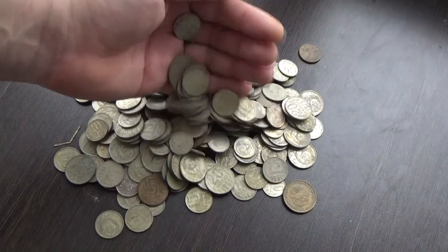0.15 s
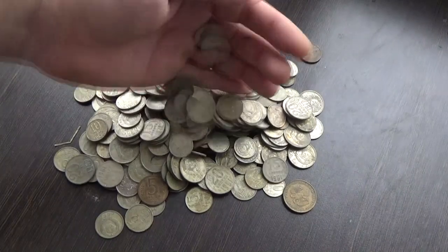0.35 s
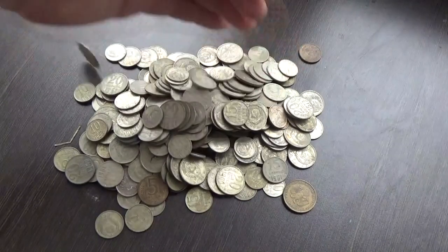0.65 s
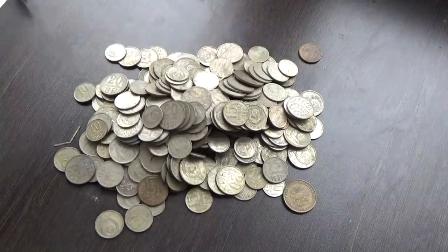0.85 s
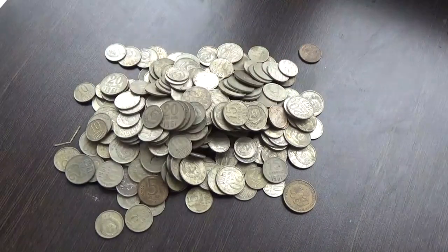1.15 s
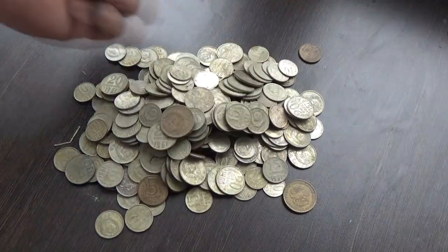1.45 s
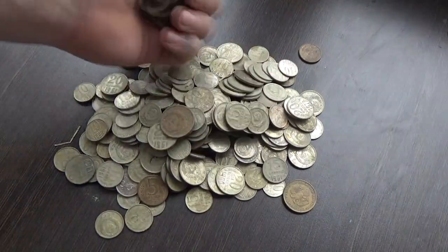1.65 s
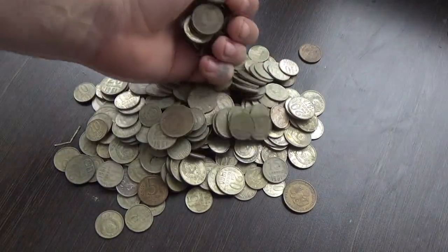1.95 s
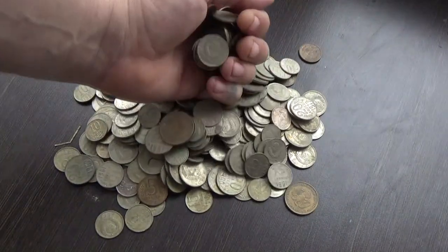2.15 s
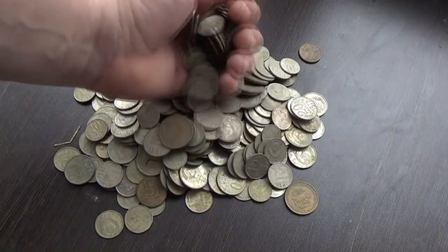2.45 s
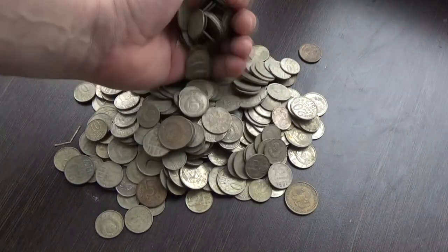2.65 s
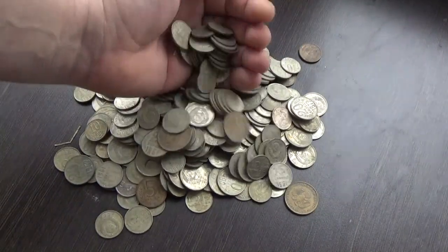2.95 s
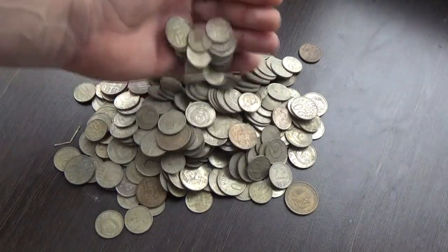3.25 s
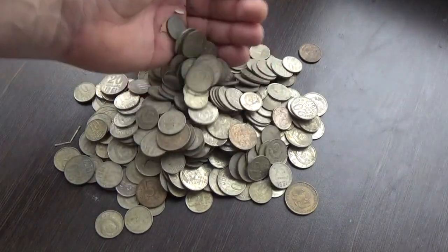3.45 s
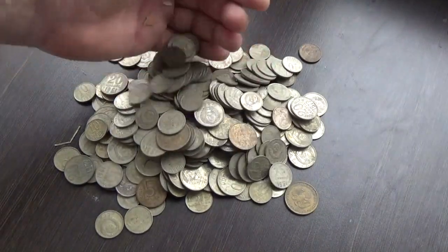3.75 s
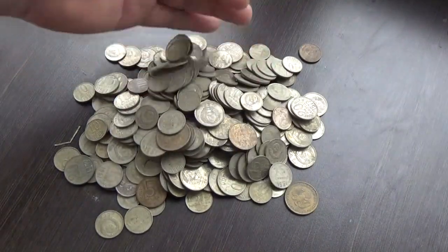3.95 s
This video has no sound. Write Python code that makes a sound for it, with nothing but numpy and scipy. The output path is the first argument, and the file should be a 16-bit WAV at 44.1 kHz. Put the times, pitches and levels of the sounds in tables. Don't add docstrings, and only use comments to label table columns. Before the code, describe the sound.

A close, slightly stereo sound of coins in a small room with a short reverberation, over faint hiss and a very low-level hum. At 0 s a dull thud of the board with a brief rattle, then sparse bright ticks. From about 0.25 to 0.6 s a handful slides onto the heap in a dense, glittering jingle with dry scrapes and knocks. At 0.62-0.75 s one coin skips sharply on bare wood at quickening intervals, chatters on its rim until 0.85, and drops flat at 0.95 under a soft hand-brushing hiss that fades by 1.2. Near quiet follows: a lone coin tips with a small clink at 1.28, and the heap creaks faintly around 1.45-1.55. Light rattling resumes at 1.7; the second handful bursts near 2.0-2.2, 2.4-2.6, strongly at 2.75-3.0, 3.3, then 3.6-4.1, with high brief rings, clicks and lower heap knocks, ending mid-pour.

```python
import sys
import numpy as np
from scipy import signal
from scipy.fft import rfft, irfft, next_fast_len
from scipy.io import wavfile
from scipy.ndimage import uniform_filter1d, minimum_filter1d, map_coordinates

SR = 44100
rng = np.random.default_rng(int(sys.argv[2]) if len(sys.argv) > 2 else 0)


def voltage_ratio(decibels):
    exponent = np.asarray(decibels, float) / 20
    return 10 ** exponent


def master(y):
    cut = np.clip(np.atleast_2d(y).T, -1, 1)
    pcm = np.round(cut * 32767)
    wavfile.write(sys.argv[1], SR, pcm.astype(np.int16))


N = 180369

# (frequency [Hz], density [dB per Hz])
AIR_SPECTRUM = [(25, -13), (70, -15), (130, -2.5), (300, -3.5), (700, 0.5), (1500, -1), (2400, -5),
                (6000, -6.5), (11000, -13.5)]
# (frequency [Hz], level [dB rms])
HUM_TONES = [(199.2, -66.5)]
# (start [s], length [s], jingle level [dB], heap rattle over it [dB])
STREAM_SURGES = [(0, 0.0057, -36, 8.5), (0.071, 0.096, -45.5, 5.5), (0.149, 0.049, -41.5, 7.5),
                 (0.256, 0.19, -30.5, -1), (0.426, 0.21, -25.5, -1.5), (0.612, 0.15, -37.5, 11.5),
                 (0.805, 0.03, -41.5, 13), (0.869, 0.16, -45, 7.5), (1.44, 0.099, -52, -4),
                 (1.697, 0.036, -35, -4.5), (1.715, 0.43, -45.5, 10.5), (1.873, 0.2, -37.5, 5),
                 (1.976, 0.13, -27.5, 1.5), (2.159, 0.04, -39, 9.5), (2.283, 0.1, -32, -12),
                 (2.403, 0.12, -27, -3), (2.497, 0.14, -38, 7), (2.596, 0.22, -39, 5.5),
                 (2.745, 0.22, -21.5, -13), (2.922, 0.066, -33.5, 3.5), (3.133, 0.09, -36.5, -7),
                 (3.227, 0.035, -32.5, -10), (3.275, 0.084, -22.5, -8), (3.527, 0.13, -35, 7.5),
                 (3.593, 0.13, -23, -9.5), (3.733, 0.073, -32.5, 1), (3.831, 0.19, -26, -3),
                 (4.048, .05, -21.5, -17)]
COIN_MODES_HZ = [7750, 8100, 8870, 9170, 9800, 10200, 10800]
# (frequency [Hz], width [Hz], level [dB])
HEAP_MODES = [(478, 150, -4), (676, 30, 7), (1452, 150, 3), (1618, 71, 9.5), (2280, 210, -0.5),
              (2900, 37, 10.5)]
# (time [s], peak [dB], centre [Hz])
BOARD_THUDS = [
    (.002, -14.5, 490),
    (.016, -22.5, 406),
    (.454, -24.5, 484),
    (2.46, -28, 574),
    (2.928, -23.5, 523),
    (3.291, -24.5, 460),
]
# (time [s], peak [dB], frequency [Hz])
TABLE_BOOMS = [(.004, -45.5, 128), (0.461, -48, 160), (2.061, -46, 272), (2.46, -50, 170), (2.93, -50, 164),
               (2.978, -55, 173), (3.295, -55, 171), (3.63, -52, 171), (3.70, -53, 172),
               (3.889, -51.5, 168), (3.999, -54, 170)]
# (time [s], peak [dB], centre [Hz])
FIRST_HANDFUL_TICKS = [(0.0102, -24, 9800), (0.0365, -24.5, 6800), (0.1314, -26, 8300), (0.1437, -20, 9250),
                       (0.1759, -17, 8750), (0.2119, -16.5, 9900), (0.2674, -9, 9000), (0.3008, -5, 9650),
                       (0.3902, -8, 8900), (0.4071, -3.5, 9300), (0.4491, -6.5, 9800), (0.4953, -9.5, 8100),
                       (0.5559, -5, 11200), (0.5641, 1, 4330), (0.5918, -7, 10430), (0.6962, -8.5, 3800),
                       (1.2846, -34, 6200), (1.2888, -8, 7640), (1.4184, -38, 4430), (1.4465, -30.5, 6400),
                       (1.5219, -26.5, 7200), (1.5564, -37.5, 6500)]
# (time [s], peak [dB], centre [Hz])
SECOND_HANDFUL_TICKS = [(1.726, -21, 7230), (1.7701, -25, 7300), (1.8187, -28, 8700), (1.88, -18, 7100),
                        (1.955, -15, 6550), (2.022, -1, 9500), (2.0605, -5.5, 4970), (2.088, -7.5, 10600),
                        (2.1078, -7, 4800), (2.163, -13.5, 6220), (2.1815, -11, 6850), (2.2002, -21, 5860),
                        (2.287, -18, 8400), (2.3783, -18, 8900), (2.4383, -8, 9800), (2.599, -13, 6500),
                        (2.623, -14, 7100), (2.656, -10, 5470), (2.713, -15, 5600), (2.9284, -10.5, 7300),
                        (3.1872, -14, 8100), (3.236, -11.5, 9230), (3.385, -13, 9000), (3.4221, -11, 9800),
                        (3.53, -16, 7050), (3.7378, -13, 8300), (3.7937, -17.5, 6350),
                        (3.8365, -10.5, 9400), (3.9463, -6, 8100), (4.0576, 2, 6260)]
# (time [s], peak [dB], centre [Hz])
STRAGGLER_TICKS = [(0.056, -28, 10400), (1.214, -41, 5000), (2.355, -18, 6000), (2.3915, -19, 9100),
                   (2.565, -18.5, 10100), (2.6995, -12, 9100), (2.81, -8, 9400), (2.8406, -13, 10200),
                   (3.015, -22.5, 8300), (3.0273, -22, 9250), (3.106, -30, 9800), (3.154, -16, 10350),
                   (2.014, -4, 9200), (2.037, -8, 10400), (3.207, -17, 8000), (3.401, -16.5, 8550),
                   (3.434, -18.5, 9000), (3.6994, -12, 10400)]
# (time [s], peak [dB], centre [Hz])
LESSER_TICKS = [(0.1607, -27, 6560), (0.2783, -26, 8170), (0.3081, -21, 8620), (0.32, -14, 8390),
                (0.328, -17, 7100), (0.3332, -15, 8360), (0.3443, -13.5, 9300), (0.3691, -19, 8360),
                (0.3737, -18, 9050), (0.381, -19, 9230), (0.4143, -13, 7970), (0.4223, -13, 8600),
                (0.4276, -15, 8970), (0.4553, -14, 7900), (0.4781, -17, 8650), (0.4874, -15, 8500),
                (0.501, -14, 8300), (0.516, -2.5, 9000), (0.522, -10, 9000), (0.5345, -16, 8310),
                (0.5464, -18, 7840), (0.5773, -22, 7850), (0.587, -26, 6840), (0.603, -12, 8720),
                (0.6135, -21, 8950), (1.743, -26, 7300), (1.9386, -26, 7400), (1.9885, -22, 7900),
                (2.0278, -0.5, 10200), (2.0422, -7, 10100), (2.055, 1, 9200), (2.0656, -16, 7400),
                (2.0912, -12, 8650), (2.0971, -11.5, 9000), (2.1194, -24, 6900), (2.1716, -31, 6400),
                (2.195, -22, 7560), (2.3104, -25, 9540), (2.316, -30, 9700), (2.3304, -24, 9100),
                (2.4075, -23, 7710), (2.4137, -18, 8620), (2.4318, -11.5, 9300), (2.4445, -13, 8850),
                (2.4515, -9, 8620), (2.4558, -12, 8950), (2.4706, -21, 7560), (2.491, -27, 8610),
                (2.497, -24, 8560), (2.5124, -12, 8060), (2.543, -35, 8240),
                (2.755, -8, 9100), (2.7759, -3, 8900), (2.8047, -15, 8520), (2.8212, -25, 8320),
                     (2.8295, -16, 8300), (2.8492, 1, 8970), (2.8545, -5, 9000), (2.872, -16, 9800),
                     (2.8793, -25, 8660), (2.8877, -26, 9400), (2.8965, -14, 8640), (2.9151, -28, 8800),
                     (2.932, -13, 7930), (2.945, -16, 8320), (2.9573, -14, 8900), (2.9662, -12, 9240),
                     (2.978, -21, 9340), (2.9858, -23, 7960), (3.2603, -15, 7230), (3.2674, -9.5, 8600),
                     (3.274, -27, 8060), (3.2847, -16, 8440), (3.298, -16, 8640), (3.306, -11, 8360),
                     (3.3152, -11, 7950), (3.328, -6.5, 8250), (3.3363, -11, 8850), (3.3462, -9, 8130),
                     (3.352, -18, 7900), (3.361, -18, 8500), (3.538, -13.5, 5660), (3.607, -16, 5140),
                     (3.6122, -9, 5340), (3.6226, -8, 9400), (3.6304, -6, 9150), (3.6395, -8, 9540),
                     (3.646, -16, 7980), (3.6494, -17, 8180), (3.68, -11, 10200), (3.686, -20, 8800),
                     (3.7052, -10, 9400), (3.7231, -19, 7860), (3.763, -15, 8000), (3.8105, -26, 6700),
                     (3.8222, -25, 6490), (3.8285, -22, 7780), (3.846, -10, 8160), (3.857, -12, 7860),
                     (3.8908, -12, 8400), (3.926, -14, 8790), (3.9533, -17, 7620), (3.9648, -11, 8170),
                     (3.9809, -24, 6800), (3.991, -22, 7150), (4, -28, 6800), (4.011, -15.5, 7040),
                     (4.0464, -15, 7350), (4.0649, -26, 8100), (4.076, -16, 7610), (4.0834, -13, 5700)]
# (time [s], peak [dB], centre [Hz])
HEAP_KNOCKS = [(0.0373, -24, 1370), (0.0985, -26, 2900), (0.1644, -16, 2900), (0.269, -12.5, 2280),
               (0.3283, -13.5, 1370), (0.4489, -19, 2620), (0.501, -19, 1810), (1.7013, -33, 1460),
               (1.7266, -25.5, 1614), (1.8812, -19, 1360), (2.0141, -14, 1500), (2.1078, -10.5, 2900),
               (2.1632, -15, 1600), (2.1818, -10, 2670), (2.202, -14, 2680), (2.6041, -13.5, 1360),
               (2.6475, -18, 950), (2.7127, -19, 2050), (2.9309, -10.5, 2360), (3.1461, -22, 950),
               (3.3279, -16, 1820), (3.5386, -13, 1670), (3.7222, -10, 1610), (3.7928, -15.5, 1630),
               (3.8115, -19, 2050), (3.8455, -12.5, 1800), (3.9809, -12.5, 2350), (3.9939, -11, 1750),
               (4.0472, -11.5, 2130)]
# (time [s], peak [dB], centre [Hz])
MORE_HEAP_KNOCKS = [(0.1765, -24.5, 2080), (0.408, -18, 2210), (0.438, -21.5, 2440), (0.455, -30, 1780),
                    (0.5135, -16, 1600), (0.5352, -19.5, 1700), (0.5541, -15, 2020), (0.5629, -20, 1960),
                    (0.5829, -19.5, 1860), (1.904, -23, 1710), (1.942, -21, 1980), (1.9737, -16.5, 1460),
                    (1.988, -17.5, 1820), (2, -21, 1470), (2.0223, -17, 1630), (2.028, -15, 2100),
                    (2.038, -23, 1590), (2.0551, -20, 1710), (2.061, -18, 2360), (2.187, -35, 2040),
                    (2.4126, -29, 1420), (2.4383, -29, 1500), (1.8200, -27, 1400), (2.472, -27, 1630),
                    (2.655, -18, 1900), (2.9454, -22.5, 1680), (2.9572, -24, 1530), (3.314, -24, 2550),
                    (3.3345, -22, 1700), (3.3558, -25, 1600), (3.3648, -20, 1520), (3.5307, -18, 1650),
                    (3.5476, -23, 1720), (3.5995, -22, 1560), (3.608, -22, 1520), (3.6141, -17.5, 1600),
                    (3.631, -18, 1720), (3.6441, -15, 1840), (1.7480, -31, 1420), (1.711, -34.5, 1420),
                    (3.7676, -21, 1570), (3.828, -18.5, 1670), (3.8372, -16.5, 1610), (3.8604, -14.5, 1510),
                    (3.8673, -22, 1520), (3.8883, -17.5, 1700), (3.9253, -19.5, 1920), (3.9491, -20, 1770),
                    (3.9572, -16.5, 1556), (3.9643, -27, 2130), (4.0113, -16, 2030), (1.7840, -27, 1450),
                    (4.0576, -11.5, 1850), (4.0833, -12, 1840)]
WEDGED_HZ = [950, 1445, 1570, 2280, 2900, 3520, 4800]
# (time [s], frequency [Hz], peak [dB], flight [s])
COIN_FLIGHTS = [(0.293, 8000, -23, 0.019), (0.438, 8160, -21, 0.022), (0.467, 9300, -19, 0.019),
                (0.511, 8570, -15, 0.0099), (0.596, 8870, -15, 0.014), (0.598, 9180, -13.5, 0.014),
                (0.703, 9250, -18, 0.024), (2.301, 7750, -19, 0.0091), (2.305, 9820, -20, 0.03),
                (2.305, 10080, -13.5, 0.0084), (2.336, 7800, -13, 0.0069), (2.422, 10500, -20.5, 0.043),
                (2.519, 9720, -15, 0.011), (2.755, 9700, -17, 0.019), (2.767, 7640, -12.5, 0.0045),
                (2.77, 6640, -26.5, 0.05), (2.795, 9830, -17, 0.0081), (2.93, 6630, -27, 0.04),
                (2.863, 10990, -15, 0.02), (2.85, 6700, -32.5, 0.09), (2.905, 10840, -27, 0.023),
                (3.137, 9950, -22, 0.0075), (3.292, 9400, -25, 0.03), (3.579, 7750, -19, 0.008),
                (3.662, 7730, -20, 0.026), (3.877, 8100, -11.5, 0.0076), (3.907, 7740, -12, 0.0043),
                (3.909, 9170, -15.5, 0.026), (3.846, 7900, -23, .03), (3.847, 9250, -19.5, 0.025),
                (2.957, 10800, -20, 0.021), (0.737, 6900, -33, 0.016), (3.933, 7830, -23, 0.039)]
# (time [s], peak [dB])
SKIPS = [
    (.6198, 1.5),
    (.6605, -1),
    (.6957, -1),
    (.7257, 0),
    (.748, -8.5),
]
# (frequency [Hz], width [Hz], level [dB])
SKIP_WOOD = [(676, 32, -7.5), (1060, 130, -11), (1600, 102, 3), (2360, 200, -2), (3220, 350, -3),
             (4940, 660, -10.5)]
# (time [s], peak [dB])
RIM_CHATTER = [(.7593, -21), (.7664, -24), (.7717, -11.5), (.776, -15), (.7812, -15), (.786, -16),
               (.79, -15), (.806, -11.5), (.8111, -13.5), (.8191, -14), (.8245, -7.5), (.8381, -14),
               (.8471, -14), (.8525, -16)]
# (frequency [Hz], width [Hz], level [dB])
RIM_WOOD = [(710, 40, -2), (1030, 330, -12), (1670, 210, 1), (2240, 240, -5.5), (3100, 240, -0.5)]
# (time [s], level [dB])
HAND_BRUSH = [
    (.82, -45.5),
    (.87, -35),
    (.93, -30.5),
    (1.02, -34.5),
    (1.06, -45.5),
    (1.11, -49),
    (1.15, -43),
    (1.215, -46),
    (1.225, -57),
]
# (time [s], peak [dB])
FLAT_DROP = [
    (.9502, -6.5),
]
# (frequency [Hz], width [Hz], level [dB])
DROP_WOOD = [(320, 120, -3.5), (636, 170, -1), (880, 200, -0.5), (1270, 290, 5.5), (1500, 150, 2),
             (1710, 240, -1), (2280, 790, -4)]
# (time [s], peak [dB], centre [Hz])
CONTACT_CLUSTERS = [
    (1.2765, -19, 5960),
    (1.902, -16, 9900),
    (1.972, -10.5, 9100),
    (2.603, -7, 10100),
    (3.577, -9, 8000),
]
# (frequency [Hz], level [dB], t60 [s])
LONE_MODES = [(2080, -9, 0.033), (3600, -12, 0.025), (4530, 0.5, 0.021), (6800, -24, 0.03),
              (7300, -7, 0.034), (8000, 1, 0.029), (9800, -8, 0.024)]
# (time [s], peak [dB], centre [Hz])
HEAP_CREAKS = [
    (1.435, -46, 2360),
    (1.462, -46, 2320),
    (1.486, -43, 2500),
    (1.504, -41, 2420),
    (1.54, -41, 2380),
]
# (frequency [Hz], t60 [s])
ROOM_DECAY = [(300, 0.33), (1500, 0.18), (5000, 0.17), (10000, 0.1)]

AIR_DB = -52
RISE_DB_PER_S, FALL_DB_PER_S = 3000, 418
SETTLE_DB, SETTLE_DB_PER_S = -21, 130
BOOM_T60_S = 0.28
LOUDEST_TICK_DB = -8
LAUNCH_DB = 2.5
CHIME_DB, CHIME_T60_S = -10, 0.015
PARTIAL_DB, PARTIAL_T60_S, PARTIAL_SPREAD = -12, 0.038, 0.038
BRUSH_HZ, BRUSH_OCTAVES = 6550, 1
LONE_S, LONE_DB = 1.2865, -20.5
LIMIT_PEAK, TOP_HZ = 0.74, 11016


def unit(x):
    return x / np.sqrt(np.mean(x ** 2) + 1e-20)


def along(points, hz):
    f, v = np.transpose(points)
    return np.interp(np.log(hz + 1), np.log(f + 1), v)


def wobble(rate_hz):
    knots = rng.standard_normal(int(N * rate_hz / SR) + 4)
    return map_coordinates(knots, [np.arange(N) * rate_hz / SR])


def filtered(x, response):
    m = next_fast_len(N + SR // 2)
    return irfft(rfft(x, m) * response(np.fft.rfftfreq(m, 1 / SR)), m)[..., :N]


def bell(centre_hz, octaves):
    return lambda hz: np.exp(-.5 * (np.log2((hz + 1) / centre_hz) / octaves) ** 2)


def resonances(modes):
    def response(hz):
        total = 0
        for k, (centre, width, db) in enumerate(modes):
            loss = 1j * hz * width
            total = total + (-1) ** k * voltage_ratio(db) * loss / (centre * centre - hz * hz + loss)
        return total
    return response


def columns(table):
    return np.array(table, float)[:, :, None].transpose(1, 0, 2)


def place(start_s, shapes):
    at = np.round(np.asarray(start_s) * SR).astype(int)[:, None] + np.arange(shapes.shape[1])
    return np.bincount(at.ravel(), shapes.ravel(), N + SR)[:N]


def damped(start_s, hz, db, t60_s, size):
    t = np.arange(size) / SR
    fade = voltage_ratio(db[:, None] - 60 * t / t60_s[:, None])
    return place(start_s, fade * np.sin(2 * np.pi * hz[:, None] * t))


def strikes(rows, octaves, skirt_db, rise_s, snap_s, rattle_s, rattle_db, size):
    start_s, db, centre_hz = columns(rows)
    t, f = np.arange(size) / SR, np.fft.rfftfreq(size, 1 / SR) + 1
    colour = np.exp(-.5 * (np.log2(f / centre_hz) / octaves) ** 2)
    colour = colour + voltage_ratio(skirt_db) * np.minimum(f / centre_hz, 1)
    noise = irfft(rfft(rng.standard_normal((len(start_s), size))) * colour, size)
    decay = voltage_ratio(-60 * t / snap_s) + voltage_ratio(rattle_db - 60 * t / rattle_s)
    blow = noise * (1 - np.exp(-t / rise_s)) * decay
    return place(start_s[:, 0], voltage_ratio(db) * blow / abs(blow).max(axis=1, keepdims=True))


def taps(rows, modes, chatter):
    start_s, db = columns(rows)
    k, width = np.arange(400), 1.5 - db / 9
    push = np.exp(-.5 * ((k - 8) / width) ** 2) / width
    push = push + chatter * rng.standard_normal((len(start_s), 400)) * np.exp(-k / 110)
    wood = resonances(modes)
    peak = abs(filtered(np.eye(1, N)[0], wood)).max()
    return filtered(place(start_s[:, 0] - 8 / SR, voltage_ratio(db) * push), wood) / (2 * peak)


def room_tone():
    mid, side = filtered(rng.standard_normal((2, N)), lambda hz: voltage_ratio(along(AIR_SPECTRUM, hz)))
    tone = voltage_ratio(AIR_DB) * unit(np.array([mid + 0.51 * side, mid - 0.28 * side]))
    t = np.arange(N) / SR
    for hz, db in HUM_TONES:
        level = voltage_ratio(db + 3.5 + 3.1 * wobble(12))
        tone = tone + level * np.sin(2 * np.pi * hz * t + 0.19 * wobble(7.86))
    return tone


def stream():
    start, length, db, depth_db = columns(STREAM_SURGES)
    t = np.arange(0, N, 32) / SR
    after = np.maximum(t - start - length, 0)
    shape_db = db - RISE_DB_PER_S * np.maximum(start - t, 0)
    shape_db = shape_db - np.minimum(FALL_DB_PER_S * after, SETTLE_DB_PER_S * after - SETTLE_DB)
    levels = []
    for extra_db in (0 * depth_db, 0.5 * depth_db + 1.5, depth_db):
        power = (voltage_ratio(shape_db + extra_db) ** 2).sum(0)
        levels.append(np.interp(np.arange(N) / SR, t, 10 * np.log10(power + 1e-12)))
    return levels


def slips(count, scatter_db):
    luck = rng.random((count, 2))
    return luck[:, 0] * N / SR, -scatter_db * np.log(1.005 - luck[:, 1])


def slide():
    jingle_db, scrape_db, rattle_db = stream()
    start_s, db = slips(count=9000, scatter_db=5.0)
    luck = rng.standard_normal((len(start_s), 2))
    pitch_hz = rng.choice(COIN_MODES_HZ, len(start_s)) * np.exp(.014 * luck[:, 0])
    rings = damped(start_s, pitch_hz, db, 0.031 * np.exp(.5 * luck[:, 1]), size=500)

    start_s, db = slips(count=6000, scatter_db=3.0)
    grains = rng.standard_normal((len(start_s), 24)) * np.exp(-np.arange(24) / 9)
    grit = place(start_s, voltage_ratio(db)[:, None] * grains)
    bright = unit(filtered(grit, bell(9000, 1.0)))
    scrape = unit(filtered(grit, bell(3800, 0.79)))
    low = unit(filtered(grit, bell(920, 0.59)))
    jingle = unit(1.03 * unit(rings) + 0.48 * bright)
    rattle = unit(0.78 * unit(filtered(grit, resonances(HEAP_MODES))) + 0.81 * low)

    surge = np.tanh(wobble(60))
    return (voltage_ratio(jingle_db + 1.8 * surge - 3.5) * jingle
            + voltage_ratio(scrape_db + 5.1 * surge - 12.5) * scrape
            + voltage_ratio(rattle_db + 3.7 * surge - 7.0) * rattle)


def thuds():
    return 0.43 * strikes(BOARD_THUDS, octaves=0.29, skirt_db=-26.5, rise_s=0.00053, snap_s=0.045,
                          rattle_s=0.07, rattle_db=-14, size=5000)


def booms():
    start_s, db, hz = np.transpose(TABLE_BOOMS)
    return damped(start_s, hz, db, BOOM_T60_S + 0 * start_s, size=8000)


def ticks():
    launches = [(s, db + LAUNCH_DB, hz) for s, hz, db, _ in COIN_FLIGHTS]
    lesser = [(s, db, 1.08 * hz) for s, db, hz in LESSER_TICKS]
    rows = FIRST_HANDFUL_TICKS + SECOND_HANDFUL_TICKS + STRAGGLER_TICKS + launches + lesser
    rows = [(s, min(db, LOUDEST_TICK_DB), hz) for s, db, hz in rows]
    start_s, db, centre_hz = np.transpose(rows)
    luck = rng.standard_normal((len(start_s), 2))
    chimes = damped(start_s, centre_hz * np.exp(0.033 * luck[:, 0]), db + CHIME_DB + 3 * luck[:, 1],
                    CHIME_T60_S + 0 * start_s, size=1500)
    snaps = strikes(rows, octaves=.3, skirt_db=-5, rise_s=3e-4, snap_s=.008,
                    rattle_s=.03, rattle_db=-11, size=1500)
    return 1.35 * snaps + chimes


def knocks():
    blows = strikes(HEAP_KNOCKS + MORE_HEAP_KNOCKS, octaves=0.92, skirt_db=-11.5, rise_s=0.00041, snap_s=0.0069,
                    rattle_s=0.062, rattle_db=-9.5, size=2500)
    return 1.295 * blows + .5 * filtered(blows, resonances(HEAP_MODES))


def nearest_wedged(hz):
    ratio = np.outer(hz, 1 / np.array(WEDGED_HZ))
    return np.take(WEDGED_HZ, abs(np.log(ratio)).argmin(axis=1))


def partials():
    start_s, db, centre_hz = np.transpose(HEAP_KNOCKS + MORE_HEAP_KNOCKS)
    luck = rng.standard_normal((len(start_s), 3))
    t60_s = PARTIAL_T60_S + 0 * start_s
    own_hz = np.sqrt(centre_hz * nearest_wedged(centre_hz))
    own = damped(start_s, own_hz, db + PARTIAL_DB + 3.5, 0.8 * t60_s, size=2000)
    other_hz = nearest_wedged(centre_hz * np.exp(0.4 * luck[:, 2])) * np.exp(PARTIAL_SPREAD * luck[:, 0])
    other = damped(start_s, other_hz, db + PARTIAL_DB + 3 * luck[:, 1], t60_s, size=2000)
    return own + other


def flights():
    start_s, hz, db, flight_s = columns(COIN_FLIGHTS)
    t, luck = np.arange(4000) / SR, rng.random((len(start_s), 2))
    fade_db = -4 * np.minimum(t / flight_s, 1) - 60 * np.maximum(t - flight_s, 0) / 0.02
    fade = voltage_ratio(fade_db) * (1 - np.exp(-t / 0.0012))
    twin = .2 * np.sin(2 * np.pi * ((hz + 250 * luck[:, :1]) * t + luck[:, 1:]))
    return place(start_s[:, 0], voltage_ratio(db - 2.5) * fade * (np.sin(2 * np.pi * hz * t) + twin))


def skipping_coin():
    return taps(SKIPS, SKIP_WOOD, chatter=.07) + taps(RIM_CHATTER, RIM_WOOD, chatter=.05)


def brush():
    time_s, db = np.transpose(HAND_BRUSH)
    hiss = filtered(rng.standard_normal(N), bell(BRUSH_HZ, BRUSH_OCTAVES))
    level_db = np.interp(np.arange(N) / SR, time_s, db, left=-120, right=-120)
    return voltage_ratio(level_db + 0.93 * wobble(39.8)) * unit(hiss)


def flat_drop():
    return taps(FLAT_DROP, DROP_WOOD, chatter=.1)


def clusters():
    return strikes(CONTACT_CLUSTERS, octaves=.5, skirt_db=-12, rise_s=2e-3, snap_s=.022,
                   rattle_s=.1, rattle_db=-15, size=4000)


def lone_coin():
    hz, db, t60_s = np.transpose(LONE_MODES)
    return damped(LONE_S + 0 * hz, hz, db + LONE_DB, t60_s, size=2000)


def creaks():
    return strikes(HEAP_CREAKS, octaves=0.18, skirt_db=-22, rise_s=.004, snap_s=.07,
                   rattle_s=.07, rattle_db=0, size=2500)


def room(x):
    hz, t, z = signal.stft(rng.standard_normal((2, SR // 3)), SR, nperseg=256)
    decay = voltage_ratio(-60 * t / along(ROOM_DECAY, hz)[:, None])
    mid, side = signal.istft(z * decay, SR, nperseg=256)[1]
    side = signal.lfilter(*signal.butter(1, 900, 'high', fs=SR), side)
    tail = np.array([mid + 0.64 * side, mid - 0.78 * side]) / np.linalg.norm(mid)
    return signal.fftconvolve(np.pad(x, (130, 0))[None], tail, axes=1)[:, :N]


def scene():
    metal = slide() + ticks() + knocks() + partials() + flights() + skipping_coin()
    metal = metal + brush() + clusters() + lone_coin() + creaks()
    board = thuds() + booms() + flat_drop()
    coins = filtered(metal, lambda hz: (1j * hz / (380 + 1j * hz)) ** 3)
    coins = coins + filtered(board, lambda hz: (1j * hz / (110 + 1j * hz)) ** 2)
    turn = np.arange(N) * 5 // SR % 3
    echo = sum(room(coins * (turn == k)) for k in range(3))
    direct = coins * voltage_ratio(np.array([[.4], [-.3]]))
    return direct + voltage_ratio(-8.0) * echo + room_tone()


def low_pass(x):
    return signal.sosfilt(signal.butter(12, 12380, fs=SR, output="sos"), x)


def record(dry):
    need = np.minimum(1, LIMIT_PEAK / (abs(dry).max(axis=0) + 1e-9))
    gain = uniform_filter1d(minimum_filter1d(need, size=90), size=80)
    edge = lambda hz: voltage_ratio(-np.clip((hz - TOP_HZ) / 14, 0, 45) - np.clip((hz - TOP_HZ) / 110, 0, 60))
    return low_pass(filtered(dry * gain, edge))


dry = scene()
out = record(dry)
master(out)
```